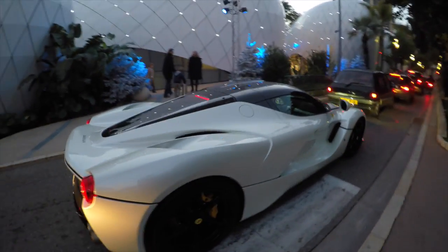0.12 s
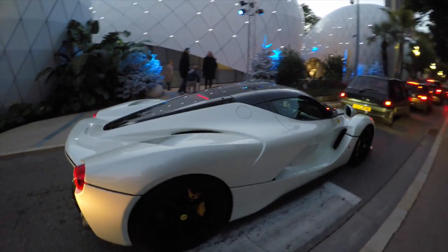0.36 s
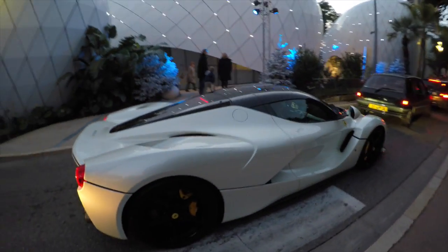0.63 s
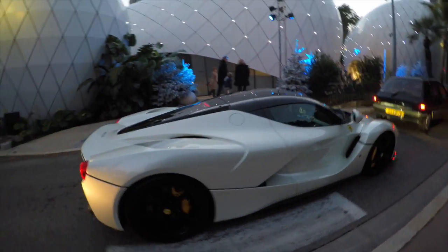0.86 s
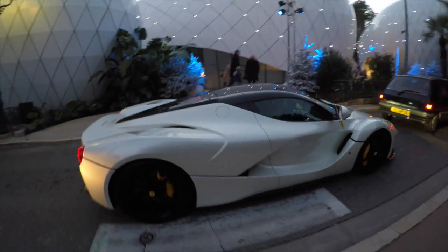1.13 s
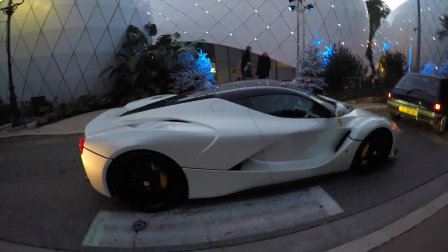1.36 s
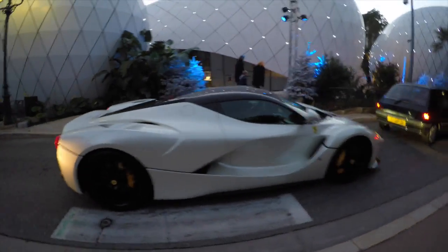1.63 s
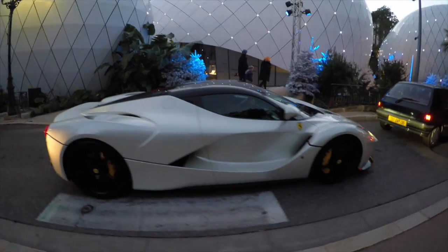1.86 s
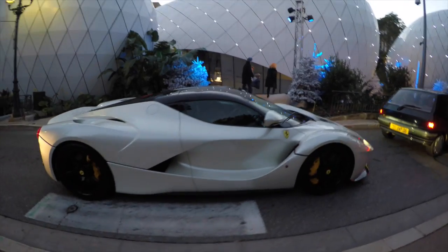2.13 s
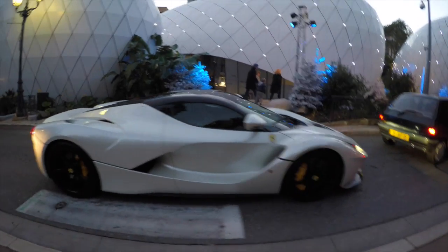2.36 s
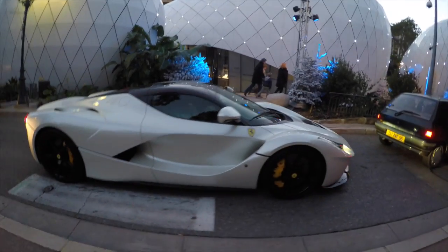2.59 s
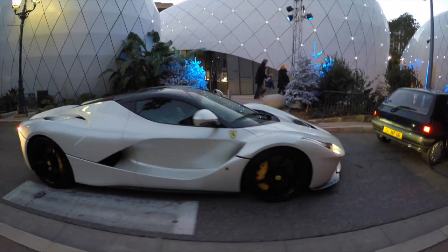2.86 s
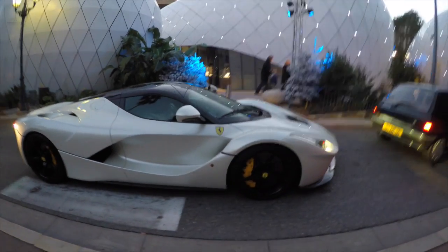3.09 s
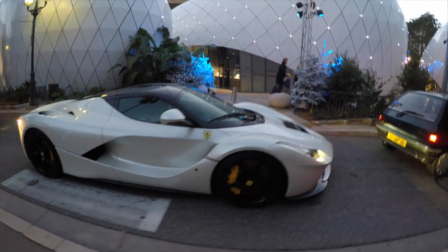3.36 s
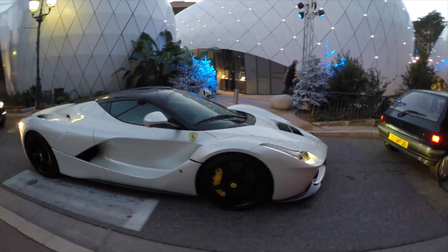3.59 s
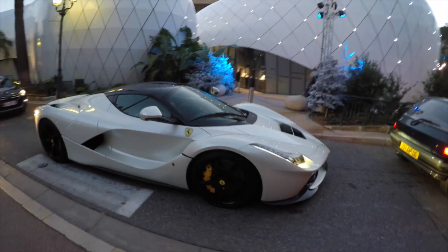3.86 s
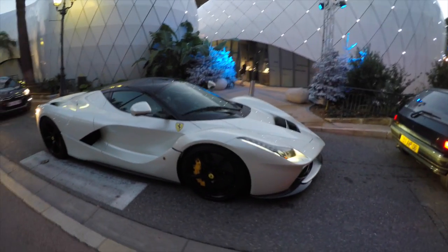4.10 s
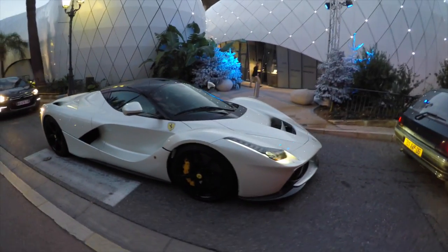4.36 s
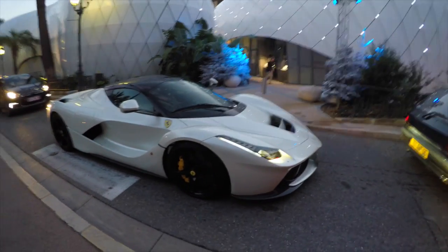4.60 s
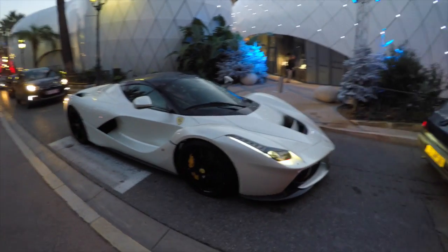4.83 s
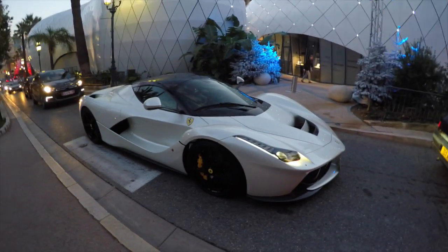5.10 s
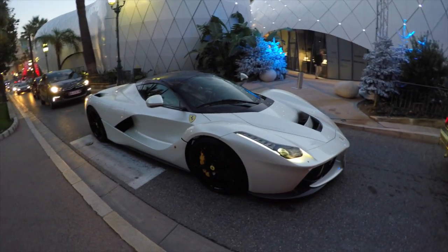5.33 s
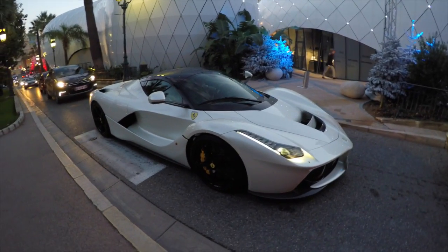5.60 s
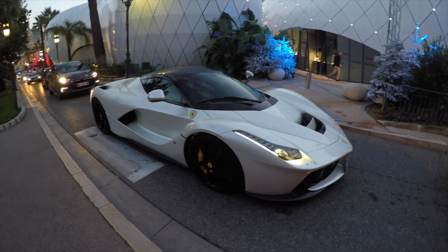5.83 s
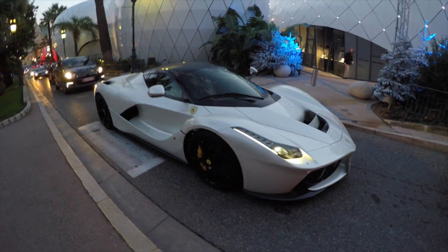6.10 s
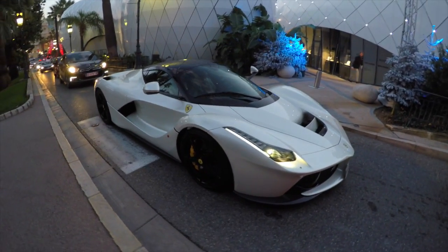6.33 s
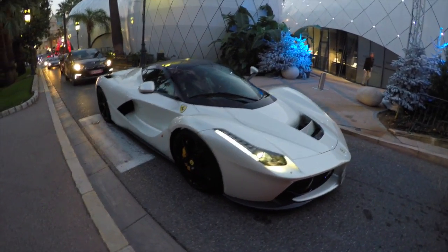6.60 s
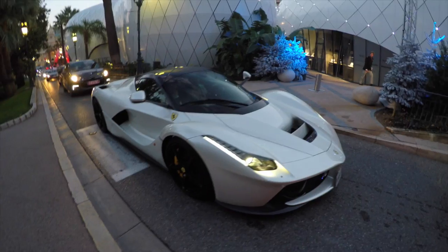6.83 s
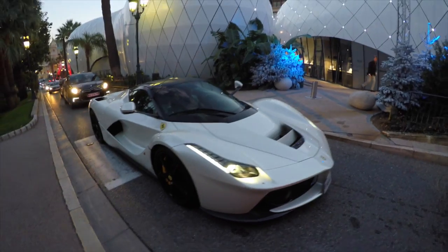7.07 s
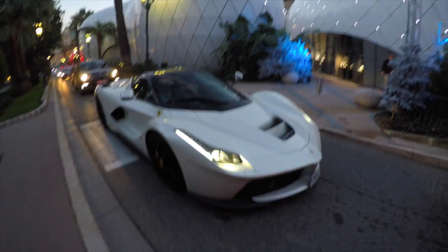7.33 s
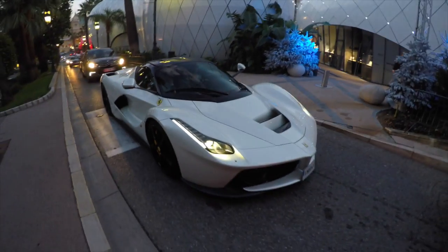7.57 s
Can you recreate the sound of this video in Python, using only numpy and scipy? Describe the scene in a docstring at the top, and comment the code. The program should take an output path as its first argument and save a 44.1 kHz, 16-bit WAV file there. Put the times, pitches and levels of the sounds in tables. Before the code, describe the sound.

A powerful twelve-cylinder car idles close by on a city street, its low exhaust hum softening amid wind rumble, traffic hiss and small housing knocks.

```python
"""A twelve-cylinder car idles on a city street, heard in a small camera's closed housing going from tail to nose.
At first its exhaust is strongest: steady tones locked to the firings, mostly below 220 Hz, with hiss and a whine.
From 2 to 4 s these parts mostly sink as the tailpipes turn away; wind gusts are strongest near 4.6 and 7.4 s.
Throughout, filtered noise makes the street, and two queueing engines hum, the farther one loudest near 7.3 s.
Short pushes ring as ticks and knocks from 0.4 to 5.2 s; three sine squeaks come between 3.3 and 6.7 s."""
import sys
import numpy as np
from scipy import signal
from scipy.fft import rfft, irfft
from scipy.io import wavfile
from scipy.ndimage import uniform_filter1d

SR = 44100
rng = np.random.default_rng(int(sys.argv[2]) if len(sys.argv) > 2 else 0)


def rack_gain(trim_db):
    """Turn a fader trim in dB into the linear factor to multiply a signal by."""
    fader = np.asarray(trim_db, float)
    return 10 ** (fader / 20)


def bounce(signal):
    """Save signal as a 16-bit WAV file at the path given by the first command-line argument."""
    frames = np.transpose(np.atleast_2d(signal))
    limited = np.clip(frames, -1, 1)
    pcm = np.round(limited * 32767).astype(np.int16)
    wavfile.write(sys.argv[1], SR, pcm)


N = 339570


def rms_one(x):
    """Scale to unit power."""
    return x / np.sqrt(np.mean(x ** 2) + 1e-20)


def in_time(rows):
    """Read every column of a time table at each sample, joining its points by straight lines."""
    s, *columns = np.transpose(rows)
    return [np.interp(np.arange(N) / SR, s, column) for column in columns]


def drift(points_per_s):
    """Slow chance: random points of spread 1 joined by straight lines."""
    points = rng.standard_normal(400)
    return np.interp(np.arange(N) / SR * points_per_s, np.arange(400), points)


def bell(at_s, half_s):
    """A smooth rise and fall around one moment."""
    return np.exp(-((np.arange(N) / SR - at_s) / half_s) ** 2)


def coloured(spectrum, peaks=()):
    """Noise with a given spectrum, lifted by bell-shaped resonances; rms 1."""
    hz = np.arange(N // 2 + 1) * SR / N + 1e-3
    colour_hz, colour_db = np.transpose(spectrum)
    db = np.interp(np.log(hz), np.log(colour_hz), colour_db)
    for centre_hz, width_hz, gain_db in peaks:
        db = db + gain_db * np.exp(-.5 * (2 * (hz - centre_hz) / width_hz) ** 2)
    white = rng.standard_normal(N)
    return rms_one(irfft(rfft(white) * rack_gain(db), N))


def resonate_twice(x, hz, width_hz):
    """Two equal two-pole resonances in a row, each with gain 1 on top."""
    r = np.exp(-np.pi * width_hz / SR)
    b = np.array([1, 0, -1]) * (1 - r * r) / 2
    a = [1, -2 * r * np.cos(2 * np.pi * hz / SR), r * r]
    return signal.lfilter(b, a, signal.lfilter(b, a, x))


def tone(cycles, db, waver_db):
    """A sine of given rms level that wavers a little, starting at a random phase."""
    level = rack_gain(db + waver_db * drift(7))
    return np.sqrt(2) * level * np.cos(2 * np.pi * (cycles + rng.random()))


# colour of the far traffic: (f/Hz, level/dB per Hz, relative)
RUMBLE_COLOUR = [(30, -9), (50, 2), (70, -0.5), (95, -3.5), (140, -10.5), (185, -17), (215, -15.5),
                 (240, -29.5), (500, -59)]


def traffic_rumble():
    """Far traffic: low noise whose level wanders."""
    return rack_gain(-32.5 + drift(4)) * coloured(RUMBLE_COLOUR)


# colour of the street hiss before the housing: (f/Hz, level/dB, relative)
STREET_COLOUR = [(150, 10), (230, 13.5), (300, 8.5), (400, 1), (600, -2.5), (1300, -6), (2000, -5.5),
                 (2900, -6), (4300, -11.5), (5500, -12), (6600, -17.5), (9000, -20), (13000, -30.5),
                 (14200, -24), (15300, -35)]
# cavities of the housing: (f/Hz, width/Hz, gain/dB)
HOUSING_CAVITIES = [(1008, 364, 9.5), (1690, 280, 3), (2410, 480, 8), (3510, 740, 7.5), (4720, 190, 4.5),
                    (7360, 540, 6)]


def street():
    """Traffic and fan hiss through the housing's cavities, lows and highs swelling apart."""
    hiss = coloured(STREET_COLOUR, HOUSING_CAVITIES)
    low = signal.sosfiltfilt(signal.butter(2, 1500, fs=SR, output="sos"), hiss)
    high = hiss - low
    # each band has a slow and a quick wander
    low_db = -49.5 + .4 * drift(1.95) + 1.1 * drift(9)
    high_db = -57.6 + .4 * drift(1.84) + 0.63 * drift(9)
    return rack_gain(low_db) * rms_one(low) + rack_gain(high_db) * rms_one(high)


# thin steady whines: (f/Hz, width/Hz, level/dB, start t/s)
WHINES = [(625, 8, -76, -1), (969, 10, -73, -1), (1850, 10, -80, -1), (7348, 30, -80, -1),
          (7428, 12, -90, -1), (8488, 12, -85, 6.2), (12228, 10, -94, -1), (14686, 50, -88, -1)]


def whines():
    """Noise twice through a narrow resonance sounds like an unsteady tone."""
    white, s = rng.standard_normal(N), np.arange(N) / SR
    out = 0
    for hz, width_hz, db, start_s in WHINES:
        fade_in = np.clip((s - start_s) / .2, 0, 1)
        out = out + rack_gain(db) * fade_in * rms_one(resonate_twice(white, hz, width_hz))
    return out


# colour of the wind: (f/Hz, level/dB, relative)
WIND_COLOUR = [(5, -52), (9, -1.5), (14, 0.5), (22, 3), (32, -0.5), (42, -13), (52, -16.5), (65, -31),
               (200, -87.5)]
# stronger gusts: (t/s, level/dB at the peak)
GUSTS = [(.34, -23.5), (.46, -23.5), (1.14, -23.5), (1.5, -24.5), (1.84, -19), (2.16, -20.5), (2.45, -24.5),
         (2.66, -22.5), (2.85, -24.5), (3.05, -23.5), (3.3, -23), (3.56, -23), (3.87, -21), (4.2, -22),
         (4.5, -15.5), (4.6, -15), (5.05, -21), (5.45, -23.5), (5.75, -22.5), (6.15, -22), (6.37, -21.5),
         (6.78, -22), (7.12, -20), (7.38, -15), (7.63, -21.5)]


def wind():
    """Wind on the housing: pressure swings mostly below 50 Hz, a restless base plus the gusts."""
    swings = coloured(WIND_COLOUR)
    window = SR // 6
    # dividing by the local strength lets the base and gusts shape the slow level
    strength = np.sqrt(uniform_filter1d(uniform_filter1d(swings ** 2, window), window))
    gusts = np.max([rack_gain(db) * bell(at_s, 0.057) for at_s, db in GUSTS], axis=0)
    base = rack_gain(-26 + 2 * drift(10))
    return np.hypot(base, gusts) * swings / strength


def queue_car(hz, gain, orders):
    """A more distant engine: a few low multiples of one slow rate."""
    cycles = np.cumsum(hz / SR)
    return gain * sum(tone(multiple * cycles, db, 1.5) for multiple, db in orders)


# blips as the second car creeps: (t/s, level/dB, half length/s, middle f/Hz, climb/Hz per s)
FAR_BLIPS = [(.2, -45, 0.18, 43.7, -1.5), (1.82, -47, .15, 45, 5), (2.7, -49, 0.2, 43.13, 0.2),
             (4.65, -45, 0.415, 43.13, 0.3), (7.25, -37.5, .33, 41.76, 7)]
# its tones: (multiple of the rate, level/dB, relative)
FAR_ORDERS = [(2, -1), (3, -3), (4, -1)]


def far_car():
    """Each blip swells while the engine's rate glides, mostly upward."""
    gain, ramps = rack_gain(-72), []
    for at_s, db, half_s, hz, climb in FAR_BLIPS:
        gain = gain + rack_gain(db) * bell(at_s, half_s)
        ramps += [(at_s - half_s, hz - half_s * climb), (at_s + half_s, hz + half_s * climb)]
    return queue_car(in_time(ramps)[0], gain, FAR_ORDERS)


# swells of the first car's hum: (t/s, level/dB, half length/s)
NEAR_SWELLS = [(0, -37.5, 0.34), (1.2, -37.5, 0.62), (2.12, -42.5, 0.048), (4.25, -46.5, 0.39),
               (6.1, -40, 0.26), (6.7, -41.5, 0.13)]
# its tones: (multiple of the rate, level/dB, relative)
NEAR_ORDERS = [(3, -3), (4, -1.5), (5, -1), (6, -10)]


def near_car():
    """A nearly steady idle whose hum swells now and then."""
    gain = rack_gain(-60.5) + sum(rack_gain(db) * bell(at_s, half_s) for at_s, db, half_s in NEAR_SWELLS)
    return queue_car(32.78 + 0.394 * drift(3), gain, NEAR_ORDERS)


# brief squeaks: (t/s, f/Hz, peak level/dB, half length/s)
SQUEAKS = [(3.324, 4700, -52, .002), (4.066, 2280, -51, .011), (6.63, 3400, -55, .008)]


def squeaks():
    """Short sine blips that rise and fall smoothly."""
    s = np.arange(N) / SR
    out = 0
    for at_s, hz, db, half_s in SQUEAKS:
        envelope = np.exp(-((s - at_s) / half_s) ** 2)
        out = out + rack_gain(db) * envelope * np.sin(2 * np.pi * hz * (s - at_s))
    return out


def struck(events, modes, contacts):
    """Each blow, a short push of its own shape, rings every mode, which then dies away."""
    push = np.full(N, 1e-18)
    for (at_s, db, *_), contact in zip(events, contacts):
        push[round(at_s * SR):][:len(contact)] += rack_gain(db) * contact
    out = 0
    for hz, db, t60_s in modes:
        r = rack_gain(-60 / (t60_s * SR))
        w = 2 * np.pi * hz / SR
        ring = signal.lfilter([0, np.sin(w)], [1, -2 * r * np.cos(w), r * r], push)
        out = out + rack_gain(db) * ring
    return out


# plastic ticks: (t/s, strength level/dB)
TICKS = [(.41, -50), (1.7945, -47), (1.8137, -30), (1.818, -46), (1.823, -41), (2.5038, -43),
         (2.8265, -37.5), (3.9165, -39), (4.5186, -33), (4.534, -43), (4.638, -38), (4.7492, -43)]
# ringing of the plastic: (f/Hz, level/dB, time to fall 60 dB/s)
TICK_MODES = [(4300, -14, .002), (5700, -8, .002), (7100, -6, .002), (8700, -9, .002), (11500, -11, .0015),
              (13600, -14, .0015)]


def ticks():
    """A hard edge slips: a millisecond of grit, swelling then gone, with little below 3.5 kHz."""
    grit = rng.standard_normal((len(TICKS), 44)) * np.hanning(44) ** 2
    grit = grit / np.linalg.norm(grit, axis=1, keepdims=True)
    rings = struck(TICKS, TICK_MODES, grit)
    return signal.sosfilt(signal.butter(4, 3500, "high", fs=SR, output="sos"), rings)


# dull knocks on the housing: (t/s, strength level/dB, contact/ms)
KNOCKS = [(2.0682, -29.5, 1.4), (2.628, -36, .7), (2.6525, -27.5, 1.6), (2.668, -42, 1.0), (2.794, -50, .6),
          (3.702, -39, 2.5), (4.444, -42, 2.8), (4.922, -42, 2.8), (5.148, -38, 3.0)]
# ringing of the housing: (f/Hz, level/dB, time to fall 60 dB/s)
KNOCK_MODES = [(330, -2.5, .025), (500, -4, .014), (780, -9, .012), (1050, -13, .01), (1800, -10, .006)]


def knocks():
    """A soft contact: the longer the push, the duller the knock."""
    sizes = [int(contact_ms * SR / 1000) for _, _, contact_ms in KNOCKS]
    return struck(KNOCKS, KNOCK_MODES, [np.hanning(size) * 4 / size for size in sizes])


# how far the tailpipes are turned away: (t/s, shading level/dB)
SHADE = [(0, 0), (1, -0.34), (2, -1), (4, -10), (5, -9), (7.7, -12.5)]


def tail_shading_db():
    """Level change as the tailpipes turn away; parts of the car take their own share of it."""
    return in_time(SHADE)[0]


# whine strongest at the tail: (f/Hz, width/Hz, unshaded level/dB)
TAIL_WHINE = (3631, 8, -74)


def tail_whine(shade_db):
    """A thin whine from the engine bay, noise in a narrow resonance, fading toward the nose."""
    hz, width_hz, db = TAIL_WHINE
    narrow = resonate_twice(rng.standard_normal(N), hz, width_hz)
    return rack_gain(db + 0.47 * shade_db) * rms_one(narrow)


# colour of the tailpipe hiss: (f/Hz, level/dB per Hz, relative)
PIPE_HISS_COLOUR = [(1200, -14), (1700, -9), (2700, -11), (3300, -2), (3800, 0), (4300, -7), (5200, -18),
                    (14000, -32)]


def pipe_hiss(rpm, shade_db):
    """Gas hiss that throbs with the firings and fades as the tailpipes turn away."""
    firing = np.cumsum(rpm / 10 / SR)  # six firings per crank turn
    throb = 1 + .25 * np.cos(2 * np.pi * firing)
    return rack_gain(-60 + 3 * shade_db) * throb * coloured(PIPE_HISS_COLOUR)


# the idle hunts a little: (t/s, crank speed/rpm before the wander, firing tone level/dB before its waver)
IDLE = [(0, 712.4, -17.5), (.6, 714.3, -25.5), (.88, 738.6, -26), (1.12, 712.5, -26.5), (1.3, 723.4, -26.5),
        (1.48, 699.6, -26), (2.1, 723, -24.5), (2.75, 710.7, -24.5), (3.7, 726, -26), (3.9, 711.2, -24),
        (4.13, 740.7, -28.5), (4.5, 716, -27.5), (5.0, 705.4, -27), (5.2, 720.4, -25.5),
        (5.5, 706.4, -25.5), (5.7, 735, -26.5), (6.3, 717, -25.5), (7.0, 722, -25.5), (7.36, 713, -30.5),
        (7.55, 738.6, -25)]


def crank_rpm():
    """Crank speed: the hunting idle plus a quick random wander."""
    return in_time(IDLE)[0] + 4 * drift(9)


# other tones locked to the engine cycle, one of them as strong as the firing tone:
# (multiple of the four-stroke cycle rate, unshaded level/dB, share of the shading)
ORDER_LEVELS = [(6, -24, 1.2), (17, -43.5, 0.075), (23, -44.5, 0.49), (24, -34, 1.1), (27, -43.5, 0.64),
                (29, -46, 0.29), (34, -45.5, 1.3), (35, -62, 0.41), (36, -41.5, 1.04), (42, -60, 0.6),
                (45, -62.5, 1), (48, -56.5, 5.3), (54, -69, 0.57)]
# silencer chambers rung by uneven firings: (f/Hz, width/Hz, level/dB, relative)
SILENCER = [(74.7, 24, 12), (104, 18, -17), (145.4, 52, -5), (161.4, 28, -10), (185, 20, -1.5),
            (208.2, 21, -7), (292, 56, -31)]


def exhaust(rpm, shade_db):
    """Twelve firings per two crank turns: clean tones, plus uneven firings ringing the silencer."""
    cycles = np.cumsum(rpm / 120 / SR)  # one four-stroke cycle takes two crank turns
    firing = 12 * cycles
    out = tone(firing, in_time(IDLE)[1], 1.07)
    out += tone(18 * cycles, -24.5 + .58 * shade_db, 2.68)
    for multiple, db, share in ORDER_LEVELS:
        out += tone(multiple * cycles, db + share * shade_db, 0.5)
    fired = np.diff(np.floor(firing), prepend=0) > 0
    uneven = fired * rng.standard_normal(N) + 1e-18
    chambers = sum(rack_gain(db) * resonate_twice(uneven, hz, width_hz) for hz, width_hz, db in SILENCER)
    return out + rack_gain(-41 + .7 * shade_db) * rms_one(chambers)


def scene():
    """Street, wind, queue, handling and the idling car in one channel."""
    background = traffic_rumble() + street() + whines() + wind()
    queue = far_car() + near_car()
    handling = squeaks() + ticks() + knocks()
    rpm, shade_db = crank_rpm(), tail_shading_db()
    car = tail_whine(shade_db) + pipe_hiss(rpm, shade_db) + exhaust(rpm, shade_db)
    return (background + queue + handling + car)[None]


def top_cut(x):
    """Nothing passes above the cut-off."""
    return signal.sosfilt(signal.butter(12, 15280, fs=SR, output="sos"), x)


def record(dry):
    """The treble above 14.3 kHz is cut steeply."""
    dull = signal.sosfilt(signal.butter(6, 14300, fs=SR, output="sos"), dry)
    return top_cut(dull)


dry = scene()
out = record(dry)
bounce(out)
```